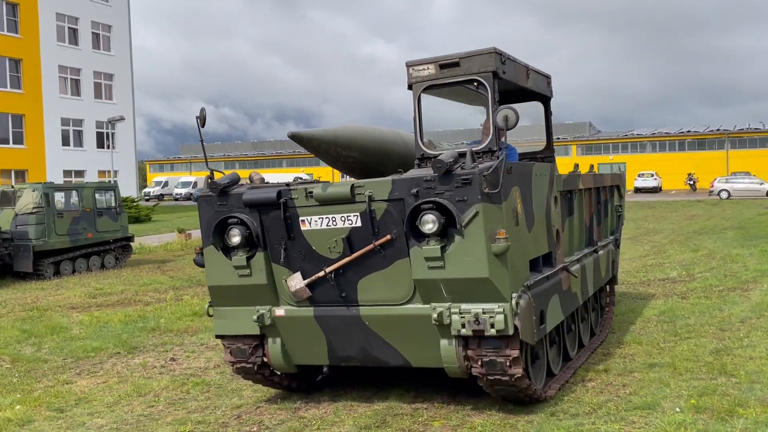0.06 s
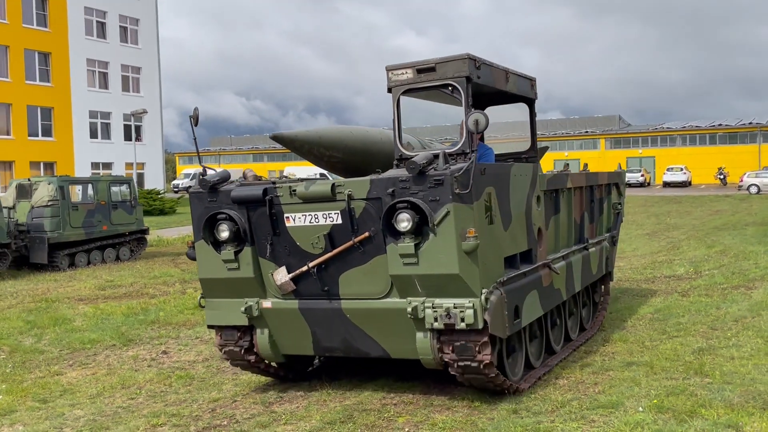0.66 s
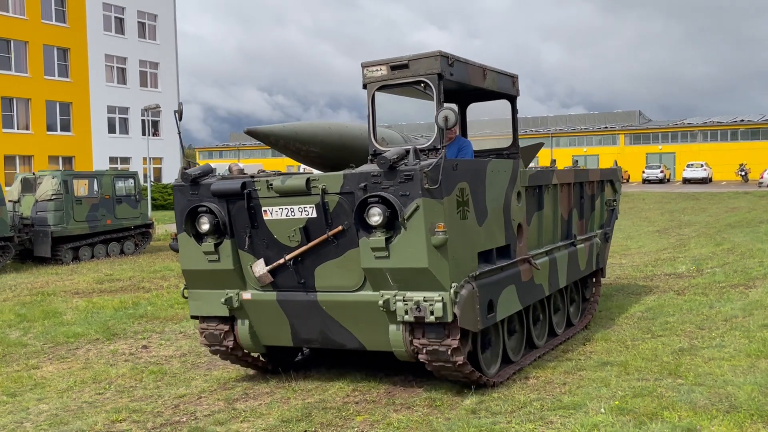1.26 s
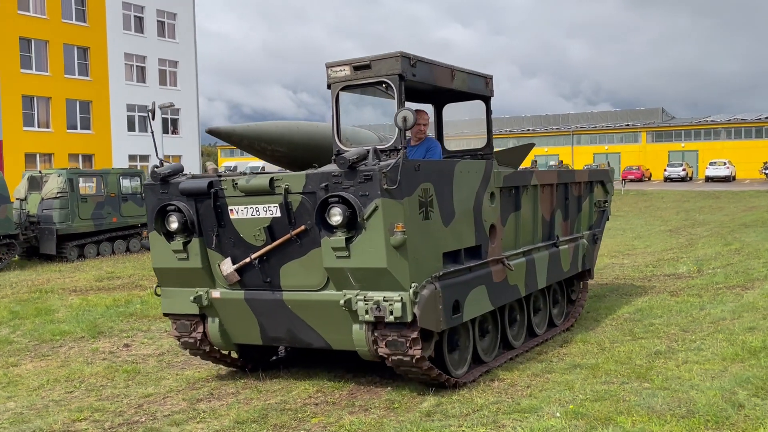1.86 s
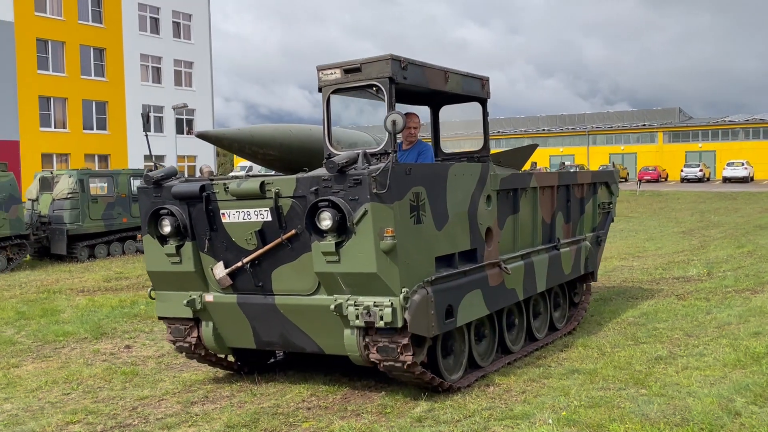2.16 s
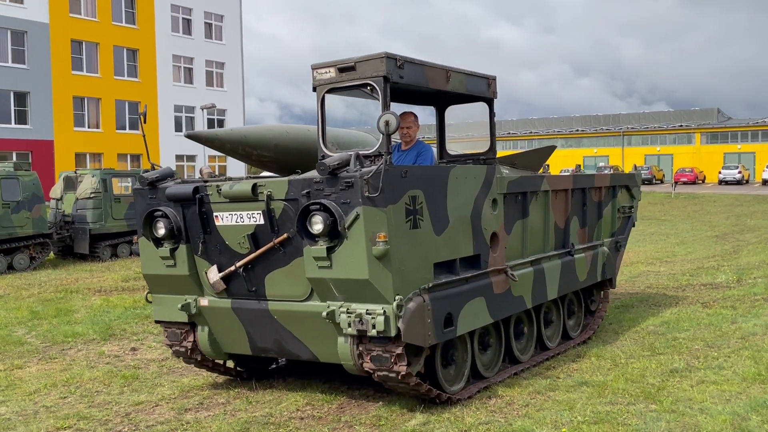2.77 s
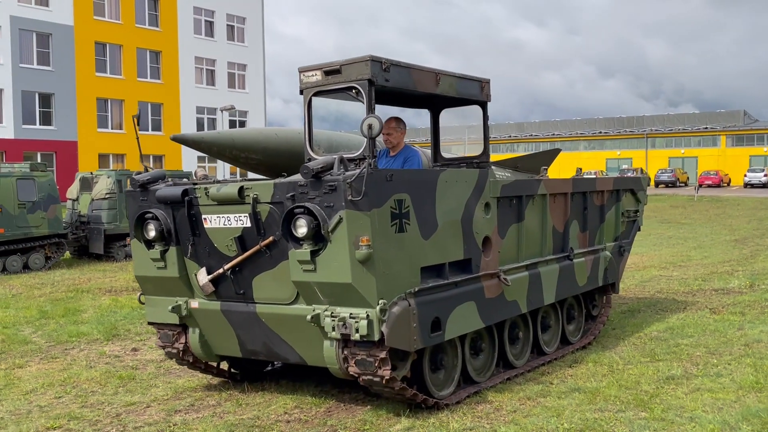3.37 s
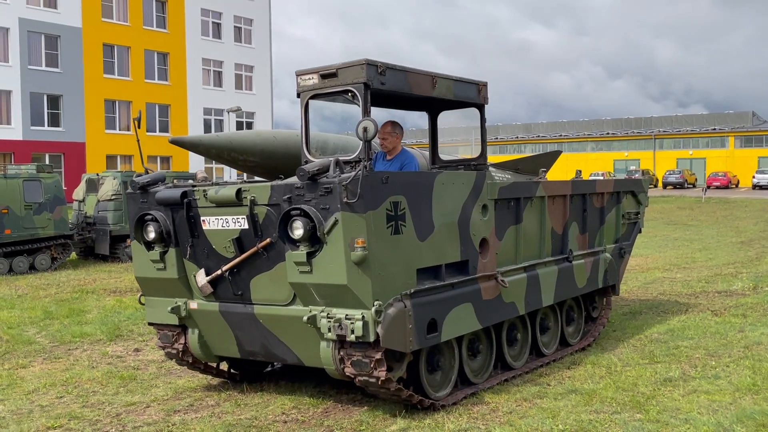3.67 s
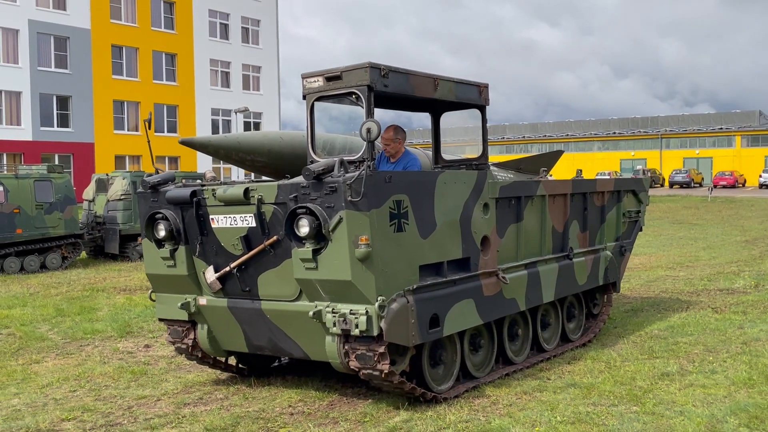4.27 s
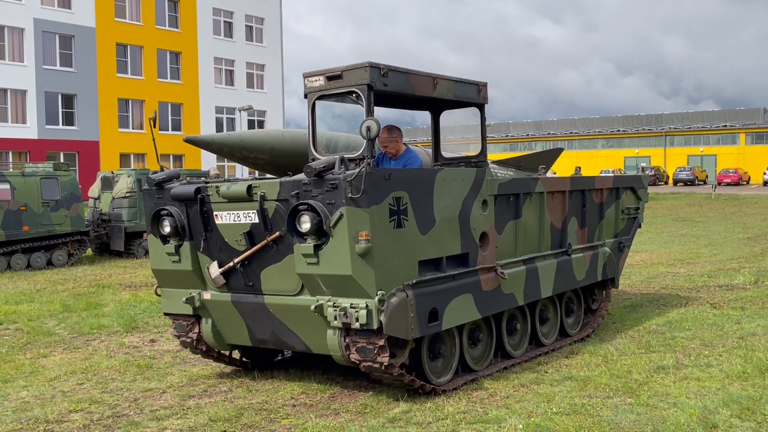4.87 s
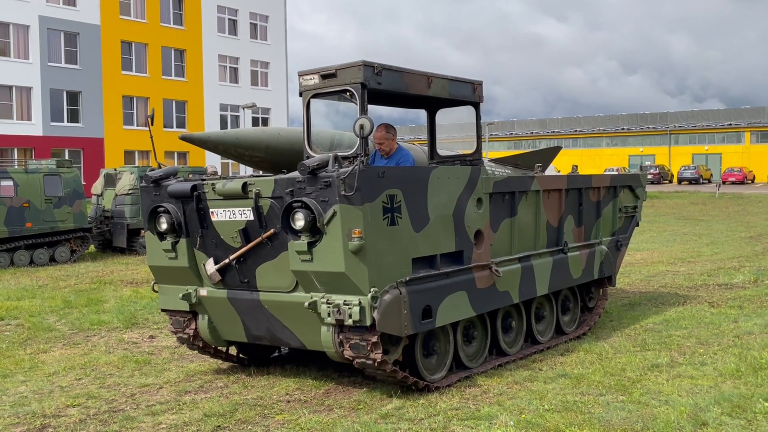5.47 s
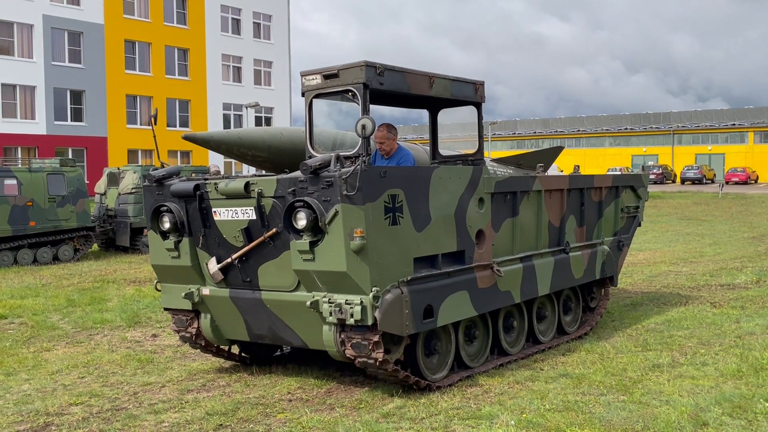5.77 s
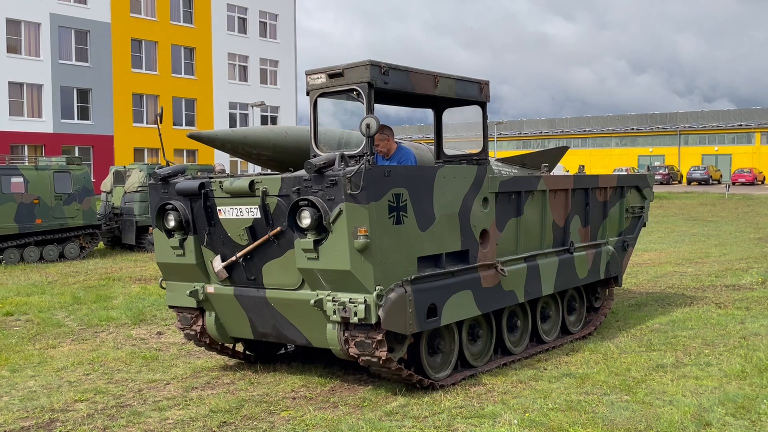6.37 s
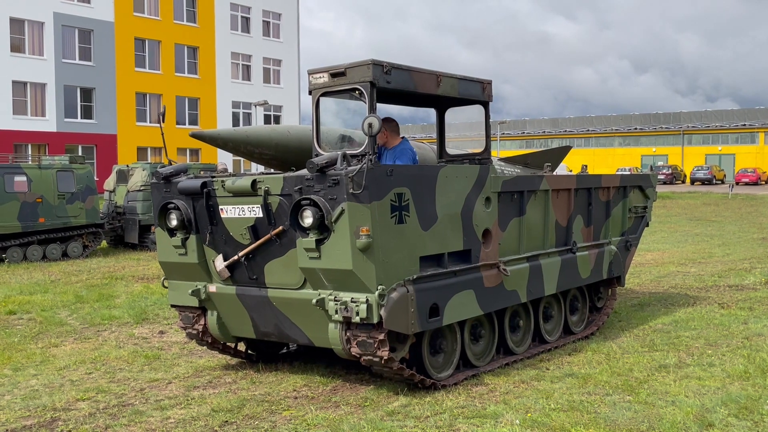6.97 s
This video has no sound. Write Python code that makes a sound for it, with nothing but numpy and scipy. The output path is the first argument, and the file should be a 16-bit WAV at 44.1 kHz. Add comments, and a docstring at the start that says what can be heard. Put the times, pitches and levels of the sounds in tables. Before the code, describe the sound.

Close by in the open air, a diesel engine throbs and rattles over a low ground rumble as a tracked carrier turns on grass. Its steel links scrape, a wheel bumps dully, and dry track pins give a short run of squeaks. After about two seconds the grinding dies away, and the engine keeps running evenly, its clatter changing tone as the vehicle's side swings toward the microphone.

```python
"""A six-cylinder two-stroke diesel drives a tracked carrier over grass; it turns and settles nearby.
The engine is a periodic source: each crank turn brings six exhaust beats, with combustion knocks, valve
clatter, injector snaps and gear tones, under the hiss of cooling air. In the turn, friction makes the
track links grind and their pins squeak over a rumble of the ground. The radiation is directional,
so the clatter changes colour as the side of the vehicle swings into view."""
import sys
import numpy as np
from scipy import signal
from scipy.fft import rfft, irfft
from scipy.io import wavfile
from scipy.ndimage import uniform_filter1d

SR = 44100
rng = np.random.default_rng(int(sys.argv[2]) if len(sys.argv) > 2 else 0)


def materialize(psi):
    """Save the field psi as 16-bit PCM at rate SR to the path in sys.argv[1].

    A 1-D psi becomes a single channel; in a 2-D psi each row is a channel.
    """
    bounded = np.clip(np.atleast_2d(psi).T, -1, 1)
    quanta = np.round(bounded * 32767).astype(np.int16)
    wavfile.write(sys.argv[1], SR, quanta)


N = 317961
TIME = np.arange(N) / SR

# Angle of view, 0 nose on and 1 side on: time_s, aspect
ASPECT = [(0, 0.15), (1.5, 0.38), (2.6, 0.59), (4.2, 0.9), (7.2, 1)]
# Drift of the crank rate with the load: time_s, offset_hz
SPEED_WANDER = [(2.5, 0), (2.95, .055), (3.75, -.075), (4.5, -.005), (5.8, 0), (6.4, .045), (7.2, .01)]
# Exhaust tones: time_s, level_db
FIRING_LEVEL = [(0.1, -16.5), (1.7, -20.5), (1.86, -18.7), (1.96, -20.5), (2.07, -27), (2.21, -25.5),
                (2.42, -34), (2.7, -24.5), (3.15, -29), (3.75, -26), (5.0, -24), (6.0, -23.8), (7.1, -24)]  # the firing tone dips as its octave takes over
OCTAVE_LEVEL = [(0.2, -27.5), (1.7, -23), (1.87, -34), (1.91, -26), (2.14, -18.5), (2.72, -26.5),
                (3.64, -23), (3.87, -37), (5.25, -30.5), (6.18, -29), (6.6, -38), (7.1, -30)]  # the octave booms and fades as the vehicle moves
# Harmonics of the crank rate: order, nose_db, side_db
UNEVEN_FIRING_ORDERS = [(3, -61, -64), (4, -40, -45), (5, -43, -38), (7, -32, -39.5), (8, -38, -47),
                        (9, -29.5, -45), (10, -33.5, -37.5), (11, -44, -55), (13, -30.5, -49),
                        (14, -56, -46.5), (15, -34.5, -42), (17, -37, -53), (18, -51, -47),
                        (19, -47.5, -46.5)]  # from unequal cylinders
GEAR_ORDERS = [(29, -45, -42), (30, -42, -45), (36, -47, -46), (37, -47, -48.5), (52, -45, -55),
               (63, -54, -53), (69, -53, -51), (81, -52, -48), (90, -50, -52), (98, -54, -48),
               (105, -49, -51), (107, -43, -50), (120, -53, -47), (136, -46, -54), (168, -48, -62),
               (175, -58, -55)]  # from the gear train and blower
# Knock of each cylinder in firing order: relative_db
CYLINDER_DB = [-7, -4, -.5, -2.5, -3.5, -7]
# Valve impacts: angle_turns, nose_relative_db, side_relative_db
VALVE_TICKS = [(.12, -1, -12), (.28, 1, 1), (.45, 0, -10), (.58, -12, 0), (.79, -12, 1), (.96, -2, -8)]
# Injector snaps, one a cylinder: angle_turns, nose_db, corner_db, side_db
INJECTOR_SNAPS = [(.1, -33, -38, -48), (.275, -35, -42, -40), (.44, -41, -36, -36.5),
                  (.595, -27.8, -37, -38.5), (.77, -38, -38.5, -39.5), (.92, -43, -40, -46)]

# Track events: start_s, length_s, level_db
LINK_SLIPS = [(.06, .12, -44), (.31, .04, -45), (.46, 0.02, -38.5), (.605, .015, -45), (.915, 0.018, -37),
              (1.02, 0.022, -42), (1.425, 0.14, -38), (1.55, 0.084, -31.5), (1.645, 0.085, -31.5),
              (1.73, 0.017, -46), (1.92, 0.063, -40.5), (2.0, 0.022, -42), (2.025, 0.067, -34.5),
              (2.13, 0.019, -37), (6.915, 0.045, -48.5)]  # steel links slipping
WHEEL_BUMPS = [(.815, .012, -25), (.835, .01, -23.5), (.848, .011, -24)]  # a road wheel bumping and rebounding
GRIT_CRACKS = [(.569, .001, -48)]  # grit cracking under a link
# Dry track pins: start_s, length_s, level_db, start_pitch_hz, end_pitch_hz
PIN_SQUEAKS = [(1.436, .02, -43, 3050, 2950), (1.561, .018, -34.5, 3050, 2870),
               (1.575, .042, -30.3, 2850, 2450), (1.595, .03, -39, 3640, 3535),
               (1.63, .016, -36, 2500, 2440), (1.657, .014, -37, 3750, 3580), (1.68, .012, -40, 3700, 3620),
               (1.705, .012, -34, 3500, 3380)]

# Shapes of spectral density: frequency_hz, relative_db
GROUND_SPECTRUM = [(15, -19), (35, -36), (60, -7), (110, 4), (180, -5), (300, -32), (600, -72)]  # ground under load
AIR_SPECTRUM = [(1290, -23), (2200, -1), (2720, -8), (4570, -12.5), (5550, -12), (6500, -19), (7010, -33.5),
                (10200, -25.5), (12000, -32.5), (13300, -42.5)]  # cooling air
HULL_SPECTRUM = [(100, -20), (190, 9), (320, 11), (460, 5), (600, -3), (800, -17), (1200, -35)]  # hull jolted by a wheel
SOIL_SPECTRUM = [(5000, -15), (7600, -8), (9500, 1), (11500, -3), (12800, -4), (13600, -28)]  # crushed soil
GRIND_SPECTRUM = [(1000, -17), (1700, -3.5), (2000, -3), (2480, -4), (3130, -6.5), (3630, -9), (3850, -7.5),
                  (4780, -10.5), (5390, -10), (6240, -13), (7160, -31), (7670, -25), (9510, -26),
                  (10900, -23), (13300, -38)]  # sliding links
INJECTOR_NOSE_SPECTRUM = [(900, -12), (1200, -5), (1400, 1), (1620, 3.5), (1880, 1.5), (2020, -5),
                          (2200, -11), (3000, -30)]  # injector ring from the front
INJECTOR_SIDE_SPECTRUM = [(900, -1), (1150, -5), (1400, 6.5), (1600, 3), (1750, -17), (2000, -8),
                          (2200, -19), (3000, -29)]  # and from the side
COVER_NOSE_SPECTRUM = [(420, -22), (560, 0), (650, -12), (800, -1), (950, 3.5), (1050, 2), (1180, 4),
                       (1330, -3.5), (1500, -3), (1650, -4), (1880, -7), (2050, -9.5), (2900, -45)]  # valve covers from the front
COVER_CORNER_SPECTRUM = [(280, -42), (470, -21), (500, -6), (535, 3), (585, -5), (660, -23), (720, -27),
                         (831, -11), (910, -10), (981, -3), (1190, -3), (1500, -11), (1760, -14),
                         (2160, -14), (2350, -30.5), (2900, -26), (3770, -55)]  # from the corner
COVER_SIDE_SPECTRUM = [(500, -28), (850, -13.5), (930, 0), (1010, 0.5), (1130, 1.5), (1280, -7.5),
                       (1420, -6), (1580, -4), (1720, -9), (1890, -14), (2010, -12), (2150, -16),
                       (2900, -29)]  # and from the side
BANK_SPECTRUM = [(700, -37), (980, 3), (1100, -10.5), (1250, -1), (1400, 5), (1600, 0), (1720, -4),
                 (2100, -16), (2900, -44)]  # near cylinder bank
PLATE_SPECTRUM = [(100, -13.5), (185, -13.5), (210, -4), (240, -6.5), (275, -1), (303, -0.5), (332, 0),
                  (372, -7.5), (412, -3), (478, -14), (533, -3.5), (585, -8), (625, -18), (675, -12),
                  (715, -9), (750, -10.5), (785, -15.5), (850, -12), (1100, -54)]  # hull plates rung through the block
THUD_SPECTRUM = [(130, -24), (200, -0.5), (270, 1), (340, 1.5), (420, -3.5), (540, -8), (800, -29)]  # one combustion
# Stereo width: frequency_hz, side_minus_mid_db
STEREO_WIDTH = [(60, -32), (130, -4), (230, -17.5), (330, -14), (520, -3.5), (760, -9.5), (1700, -6),
                (2400, -21.5), (3500, -8), (5000, -28), (6200, -6.5), (7200, 16), (9500, -3.5),
                (12000, -15), (14500, 20)]

IDLE_HZ, RUN_HZ, THROTTLE_S = 10.945, 11.36, 1.58  # crank rate before and after the throttle opens
TURN_ENDS_S = 2.18
VIEW_ASPECTS = (.25, .6, .93)  # nose, corner and side face the listener


def undb(db):
    """Amplitude ratio of a level in decibels."""
    return 10 ** (np.asarray(db) / 20)


def curve(table):
    """Linear interpolation of a table through time."""
    return np.interp(TIME, *np.transpose(table))


def noise():
    """Two uncorrelated white noises, mid and side."""
    return rng.standard_normal((2, N))


def walk(rate_hz):
    """Low-pass random modulation: held values, smoothed twice, with unit deviation."""
    hold = int(SR / rate_hz)
    steps = np.repeat(rng.standard_normal(N // hold + 1), hold)
    smooth = uniform_filter1d(uniform_filter1d(steps, hold), hold)[:N]
    return smooth / np.std(smooth)


def radiate(source, spectrum):
    """Source and filter: a mid and side pair is coloured, scaled to mid rms 1 and made left and right."""
    log_f = np.log(np.fft.rfftfreq(N, 1 / SR) + 1)
    def gain(points):
        hz, db = np.transpose(points)
        rolloff_db = 60 * np.maximum(log_f - np.log(hz[-1]), 0)
        return undb(np.interp(log_f, np.log(hz), db) - rolloff_db)
    width = np.array([np.ones(len(log_f)), gain(STEREO_WIDTH)])
    mid, side = irfft(rfft(source) * gain(spectrum) * width, N)
    return np.array([mid + side, mid - side]) / np.std(mid)


def steady(pair):
    """Power normalisation: the mid is held at rms 1 over about four crank turns."""
    power = uniform_filter1d(np.mean(pair, axis=0) ** 2, size=int(4 * SR / RUN_HZ))
    return pair / np.sqrt(power)


def bursts(table, attack_s, decay_s):
    """Envelope of transients that rise linearly, hold and decay exponentially."""
    envelope = 0
    for start_s, length_s, level_db in table:
        rise = np.clip((TIME - start_s) / attack_s, 0, 1)
        decay = np.exp(-np.maximum(TIME - start_s - length_s, 0) / decay_s)
        envelope = envelope + undb(level_db) * rise * decay
    return envelope


def crank_pulse(turns, angle, width_turns):
    """Periodic Gaussian pulse centred on a crank angle."""
    return np.exp(-.5 * (((turns - angle + .5) % 1 - .5) / width_turns) ** 2)


def cyclic_noise(turns, aspect, loose, size=3900, count=4):
    """Cyclic excitation: once-a-turn patterns crossfade with aspect; a loose share never repeats."""
    place, out = turns % 1 * size, 0
    view = np.clip(aspect, 0, 1) * (count - 1)
    for k in range(count):
        phases = np.exp(2j * np.pi * rng.random((2, size // 2 + 1)))
        patterns = irfft(phases, size) * np.sqrt(size)
        share = np.cos(np.pi / 2 * np.clip(view - k, -1, 1))
        out = out + share * np.array([np.interp(place, np.arange(size), p, period=size) for p in patterns])
    return out + loose * noise()


def harmonics(table, turns, aspect, wobble_rad, wobble_hz):
    """Wavering harmonics of the crank rate; quadratic phases keep them from piling into one thump."""
    out = 0
    for order, nose_db, side_db in table:
        level_db = nose_db + (side_db - nose_db) * aspect + 2.0 * walk(2.23)
        cycles = order * turns + order ** 2 / (2 * len(table) + 2)
        out = out + undb(level_db) * np.cos(2 * np.pi * cycles + wobble_rad * walk(wobble_hz))
    return np.sqrt(2) * out


def facing(aspect):
    """Directivity: the shares of nose, corner and side in what is heard."""
    return np.array([np.interp(aspect, VIEW_ASPECTS, share) for share in np.eye(3)])


def steering(release_s):
    """Exponential release: 1 while the vehicle turns, dying away afterwards."""
    return np.exp(-np.maximum(TIME - TURN_ENDS_S, 0) / release_s)


def crank_rate(hunt_hz=.8, settle_s=1.0):
    """Damped step response: the governor overshoots and settles on a higher rate, in turns a second."""
    since_s = np.maximum(TIME - THROTTLE_S, 0)
    hunting = np.exp(-since_s / settle_s) * np.cos(2 * np.pi * hunt_hz * since_s)
    return RUN_HZ - (RUN_HZ - IDLE_HZ) * hunting + curve(SPEED_WANDER)


def ground_rumble(rolling_db=-38, turn_boost_db=3.5):
    """Forced vibration: the ground rumbles under the moving weight, more so in the turn."""
    level_db = rolling_db + turn_boost_db * steering(release_s=2.5)
    return radiate(noise(), GROUND_SPECTRUM) * undb(level_db)


def cooling_air(turns, level_db=-49.5):
    """Broadband flow noise, modulated a little in amplitude on each crank turn."""
    pulse_db = 0.49 * np.cos(2 * np.pi * (turns - .35)) + 0.2 * walk(18) + 0.89 * walk(90)
    return radiate(noise() * undb(pulse_db), AIR_SPECTRUM) * undb(level_db)


def wheel_bumps():
    """Damped impacts: a road wheel bumps and rebounds, thudding in the hull."""
    return radiate(noise(), HULL_SPECTRUM) * bursts(WHEEL_BUMPS, attack_s=.0033, decay_s=.0062)


def track_links(scrub_db=-47.3, soil_relative_db=-19):
    """Sliding friction: steel links scrub sideways and slip, crushing soil and grit."""
    grit = noise() * undb(2.0 * walk(1500) + 1.4 * walk(260))
    scrub = steering(release_s=.068) * undb(scrub_db + walk(24.6))
    slips = bursts(LINK_SLIPS, attack_s=.024, decay_s=.02)
    grind = radiate(grit, GRIND_SPECTRUM) * np.hypot(scrub, slips)
    crackle = radiate(noise() * undb(4.5 * walk(2500)), SOIL_SPECTRUM)
    cracks = bursts(GRIT_CRACKS, attack_s=.0005, decay_s=.0013)
    return grind + crackle * (slips * undb(soil_relative_db) + cracks)


def track_pins(glide_s=.018):
    """Stick-slip friction: each dry pin squeaks roughly about a resonance that drops and holds."""
    out, roughness = 0, walk(850) + 1j * walk(850)
    for start_s, length_s, level_db, start_hz, end_hz in PIN_SQUEAKS:
        pitch_hz = end_hz + (start_hz - end_hz) * np.exp(-np.maximum(TIME - start_s, 0) / glide_s)
        ring = np.real(roughness * np.exp(2j * np.pi * np.cumsum(pitch_hz) / SR))
        out = out + ring * bursts([(start_s, length_s, level_db)], attack_s=.0028, decay_s=.013)
    return out * undb([[2.5], [0]])  # a little to the left


def gears(turns, aspect):
    """Rotational harmonics: the gear train and blower whine at multiples of the crank rate."""
    return harmonics(GEAR_ORDERS, turns, aspect, wobble_rad=.9, wobble_hz=22)


def injectors(turns, aspect):
    """Impulsive excitation: six metallic snaps a turn, duller and more even from the side."""
    shares = facing(aspect)
    snaps = sum(undb(np.dot(levels_db, shares)) * crank_pulse(turns, angle, width_turns=.036)
                for angle, *levels_db in INJECTOR_SNAPS)
    excitation = cyclic_noise(turns, aspect, loose=1.5)
    nose = (1 - shares[-1]) * radiate(excitation, INJECTOR_NOSE_SPECTRUM)
    side = shares[-1] * radiate(excitation, INJECTOR_SIDE_SPECTRUM)
    return snaps * steady(nose + side)


def cylinder_bank(turns, aspect, side_db=-37.3, angle_turns=.56, half_width_turns=.35):
    """Directional radiation: the near bank chugs to the side in one broad burst a turn."""
    offset = ((turns - angle_turns + .5) % 1 - .5) / half_width_turns
    ring = steady(radiate(cyclic_noise(turns, aspect, loose=.7), BANK_SPECTRUM))
    return ring * np.exp(-offset ** 4) * aspect * undb(side_db)


def valves(turns, aspect, nose_db=-31.53, side_db=-36.23):
    """Impact and resonance: ticks at fixed crank angles ring the covers, over a steady rattle."""
    ticks = sum(undb(nose + (side - nose) * aspect) * crank_pulse(turns, angle, width_turns=.034)
                for angle, nose, side in VALVE_TICKS)
    excitation = (1.6 + ticks) * cyclic_noise(turns, aspect, loose=.7)
    spectra = COVER_NOSE_SPECTRUM, COVER_CORNER_SPECTRUM, COVER_SIDE_SPECTRUM
    ring = sum(share * radiate(excitation, spectrum) for share, spectrum in zip(facing(aspect), spectra))
    return ring * undb(nose_db + (side_db - nose_db) * aspect)


def with_hull_reflection(direct, aspect):
    """Comb filter: a short echo off the hull; its delay shrinks in the turn, so hollow peaks glide up."""
    delay_s = np.interp(aspect, [0, 1], [.0044, .00383])
    share = np.interp(aspect, [0, 1], [.55, .2])
    reflected = np.array([np.interp(TIME - delay_s, TIME, channel) for channel in direct])
    return (direct + share * reflected) / np.hypot(1, share)


def combustion(turns, aspect, knock_db=-38.5, plates_db=-32.5):
    """Structure-borne sound: each firing thuds through the block and rings the hull plates."""
    def blows(position, width_turns):
        return sum(undb(db) * crank_pulse(position, k / len(CYLINDER_DB) - .01, width_turns)
                   for k, db in enumerate(CYLINDER_DB))
    jittered = turns + .004 * walk(60)
    force = blows(jittered, width_turns=.002) * undb(1.5 * walk(50))
    thud = radiate(force * np.array([np.ones(N), walk(70)]), THUD_SPECTRUM)
    shaking = (.45 + blows(turns, width_turns=.045)) * cyclic_noise(turns, aspect, loose=.75)
    plates = steady(radiate(shaking, PLATE_SPECTRUM))
    return thud * undb(knock_db) + plates * undb(plates_db)


def exhaust(turns, aspect):
    """Periodic outflow: six beats a turn give a tone and its octave; unequal cylinders add other orders."""
    firing_db, octave_db = curve(FIRING_LEVEL), curve(OCTAVE_LEVEL)
    firing_phase = 2 * np.pi * 6 * (turns - .13)
    octave_phase = 2 * firing_phase + 2.45 * aspect  # slips as the path round the hull changes
    throb = 1 + 0.39 * aspect * np.cos(2 * np.pi * (turns - .7))
    drone = -throb * (undb(firing_db) * np.cos(firing_phase) + undb(octave_db) * np.cos(octave_phase))
    # reflection from house fronts puts left and right out of step
    echo = undb(firing_db - 24.5) * np.sin(firing_phase) + undb(-54 + 16.3 * aspect) * np.sin(octave_phase)
    rumble = harmonics(UNEVEN_FIRING_ORDERS, turns, aspect, wobble_rad=.79, wobble_hz=7)
    return np.sqrt(2) * np.array([drone + echo, drone - echo]) + rumble


def scene():
    """Superposition: one crank angle times the engine's sounds, and the tracks add their own."""
    aspect = curve(ASPECT)
    turns = np.cumsum(crank_rate()) / SR
    tones = exhaust(turns, aspect) + gears(turns, aspect)
    clatter = with_hull_reflection(valves(turns, aspect) + cylinder_bank(turns, aspect), aspect)
    engine = tones + clatter + combustion(turns, aspect) + injectors(turns, aspect) + cooling_air(turns)
    return engine + track_links() + wheel_bumps() + ground_rumble() + track_pins()


def record(dry):
    """Band limiting: a steep low-pass cuts the top treble, after a brief fade at each end."""
    fade_s, cutoff_hz = .004, 15700
    fade = np.minimum(np.minimum(TIME, TIME[-1] - TIME) / fade_s, 1)
    return signal.sosfilt(signal.ellip(8, .2, 70, cutoff_hz, fs=SR, output="sos"), dry * fade)


dry = scene()
out = record(dry)
materialize(out)
```